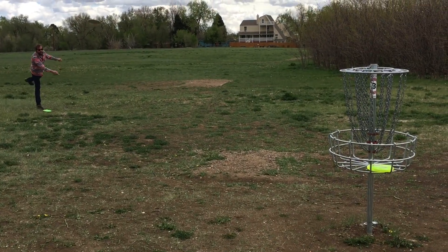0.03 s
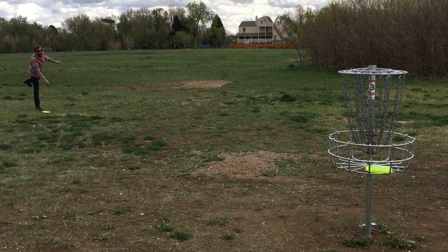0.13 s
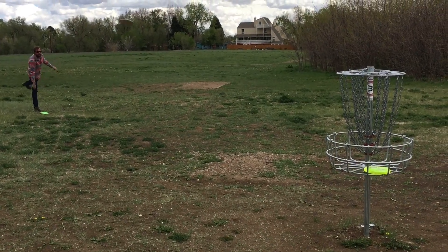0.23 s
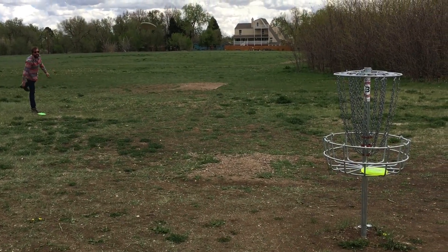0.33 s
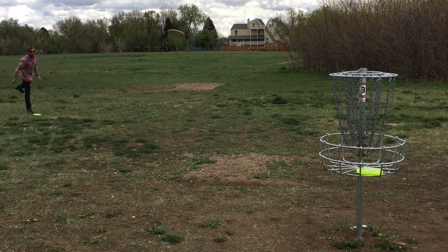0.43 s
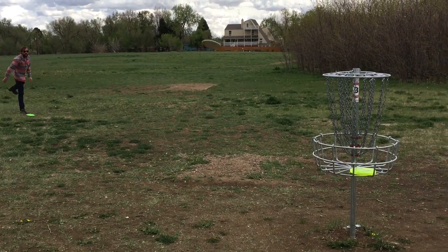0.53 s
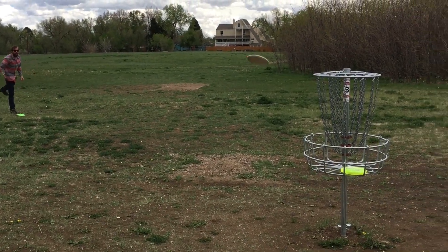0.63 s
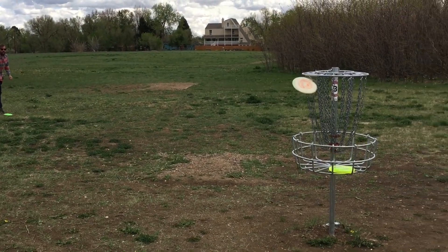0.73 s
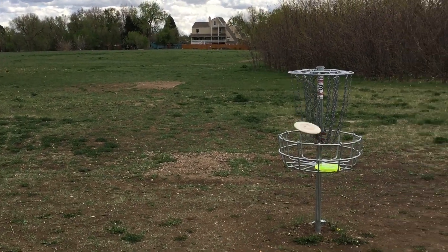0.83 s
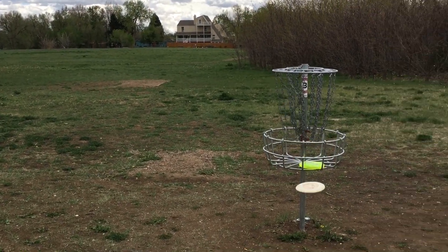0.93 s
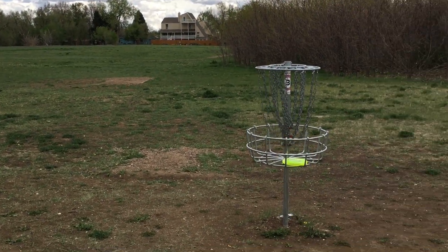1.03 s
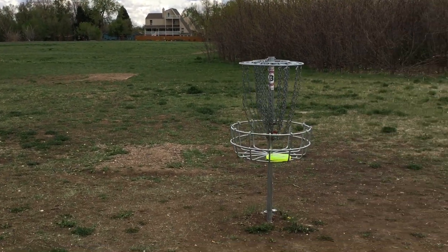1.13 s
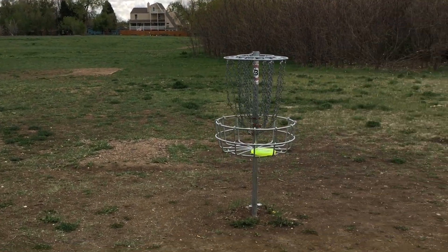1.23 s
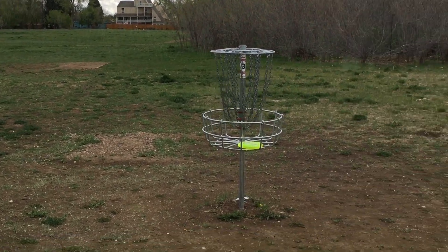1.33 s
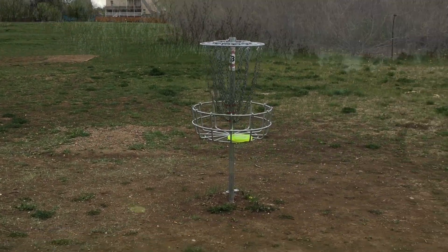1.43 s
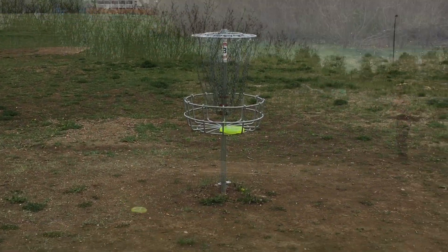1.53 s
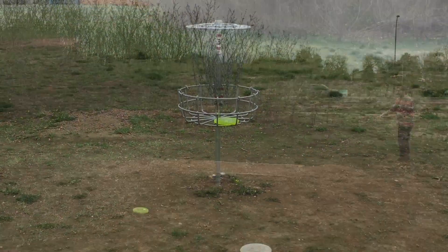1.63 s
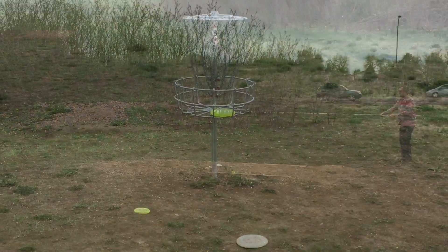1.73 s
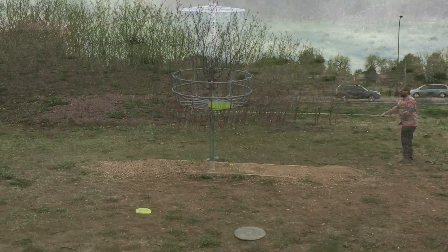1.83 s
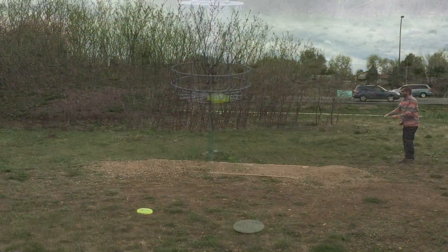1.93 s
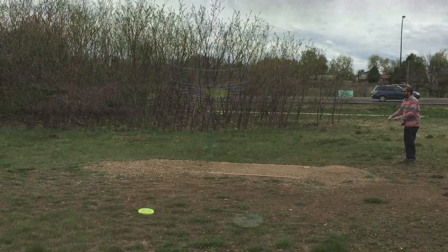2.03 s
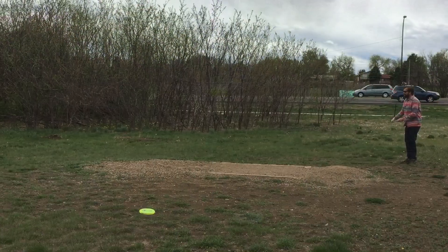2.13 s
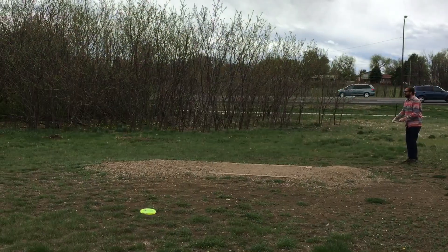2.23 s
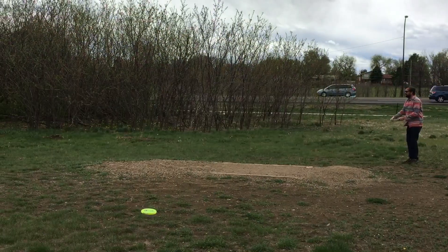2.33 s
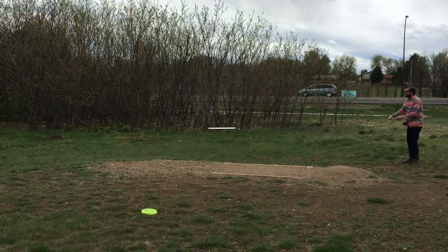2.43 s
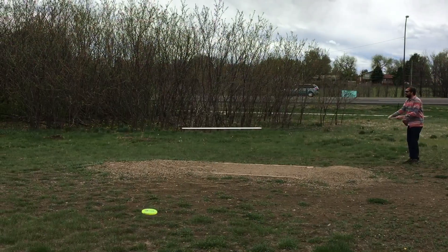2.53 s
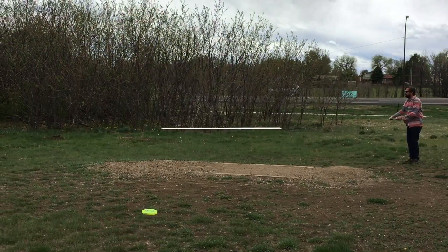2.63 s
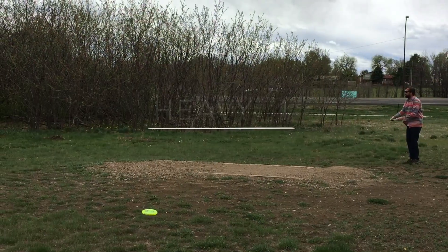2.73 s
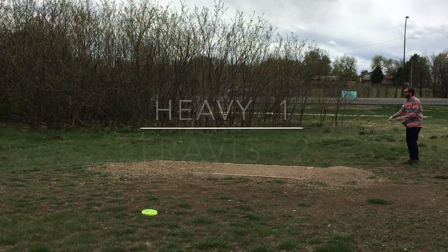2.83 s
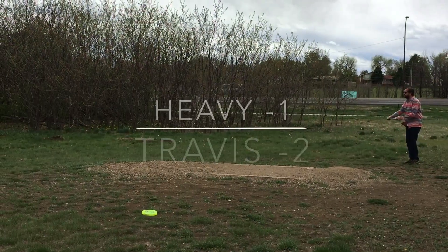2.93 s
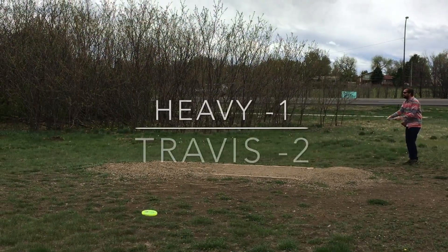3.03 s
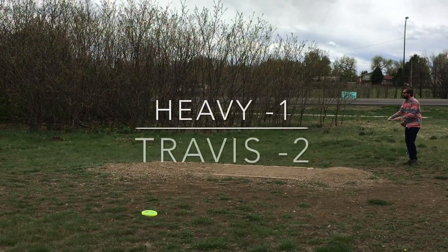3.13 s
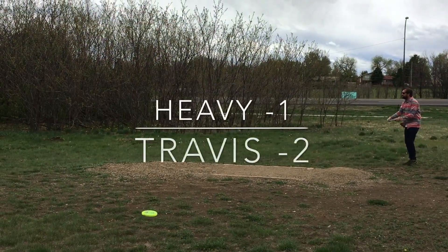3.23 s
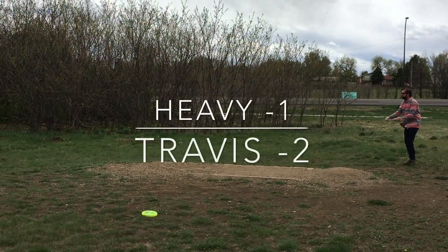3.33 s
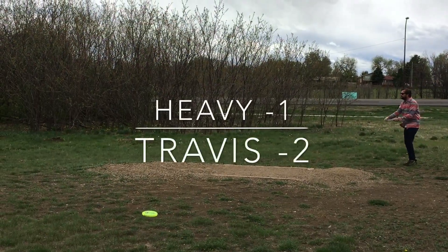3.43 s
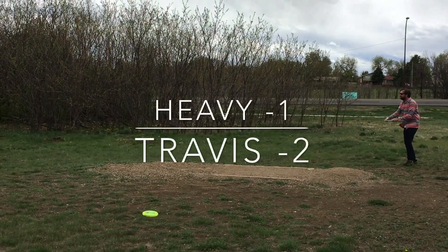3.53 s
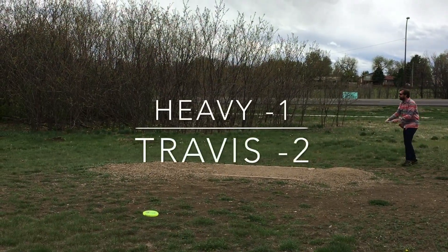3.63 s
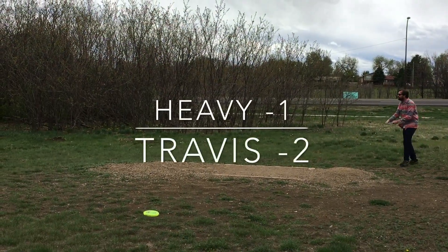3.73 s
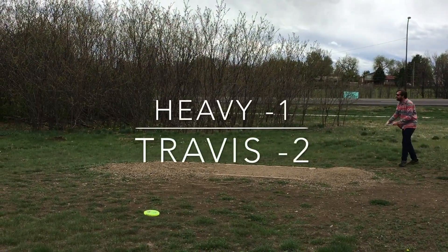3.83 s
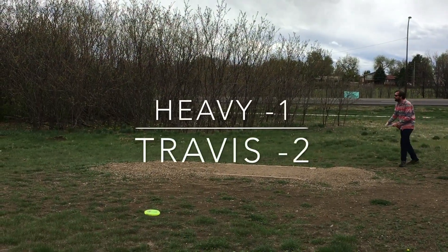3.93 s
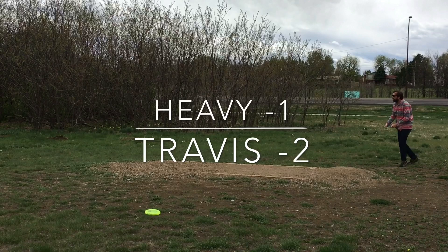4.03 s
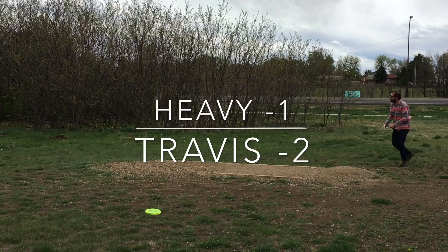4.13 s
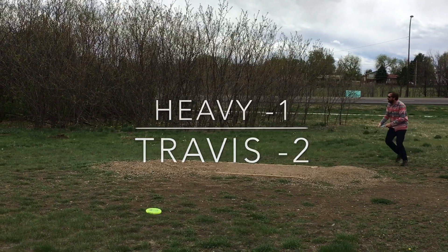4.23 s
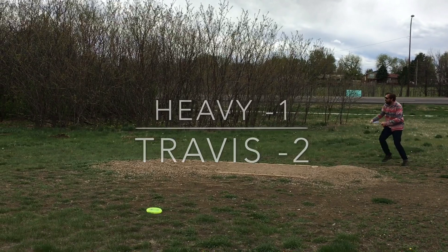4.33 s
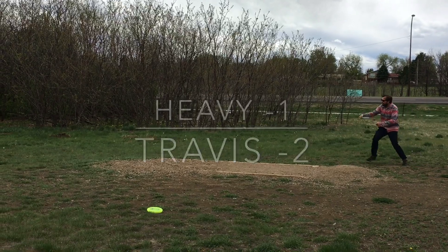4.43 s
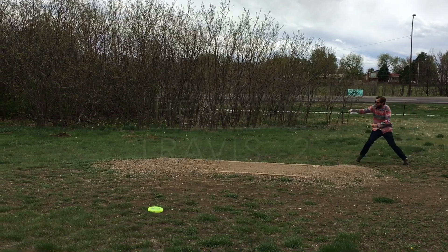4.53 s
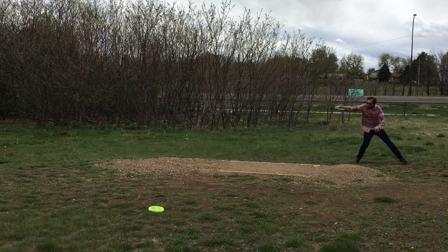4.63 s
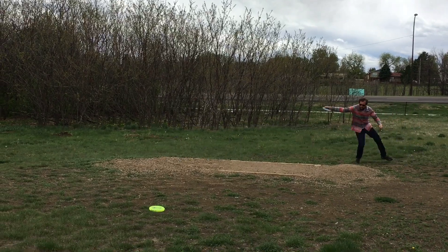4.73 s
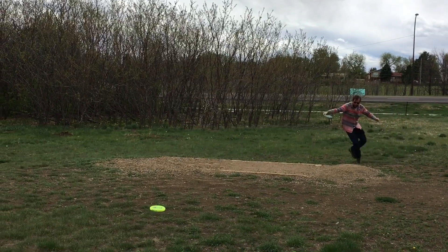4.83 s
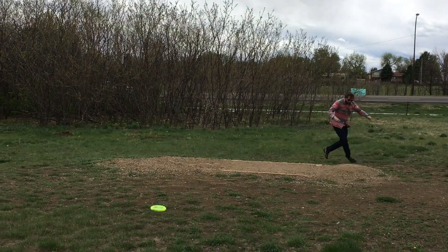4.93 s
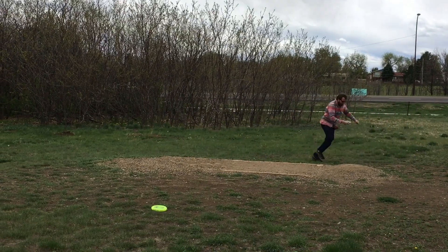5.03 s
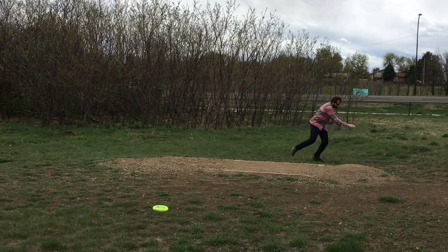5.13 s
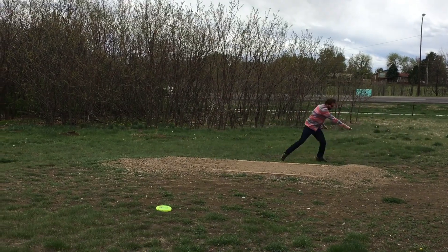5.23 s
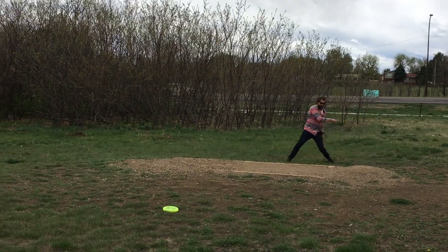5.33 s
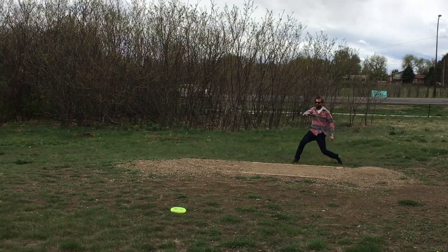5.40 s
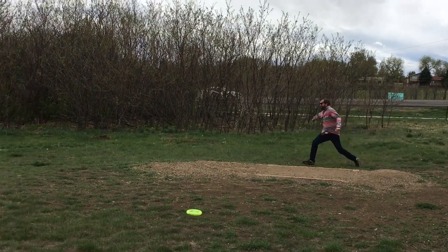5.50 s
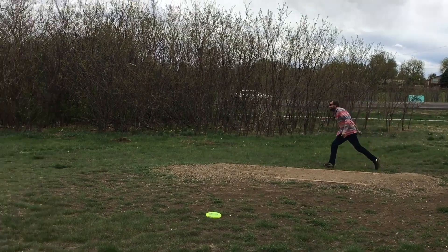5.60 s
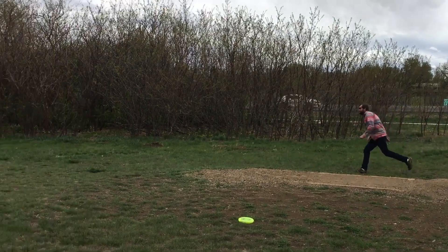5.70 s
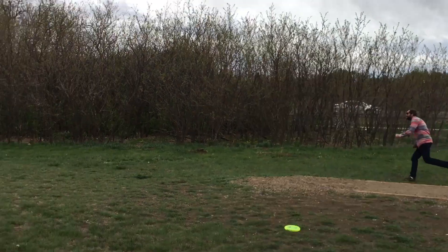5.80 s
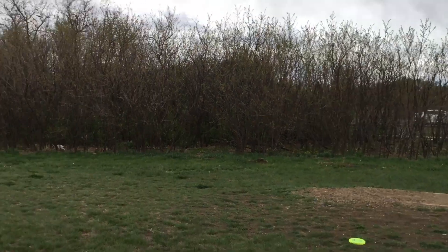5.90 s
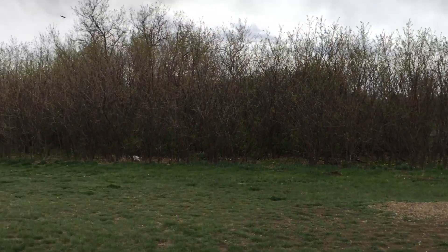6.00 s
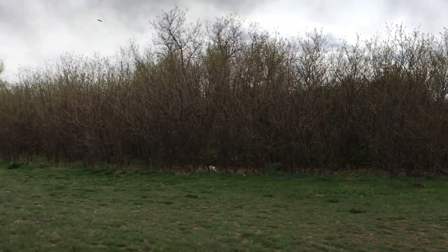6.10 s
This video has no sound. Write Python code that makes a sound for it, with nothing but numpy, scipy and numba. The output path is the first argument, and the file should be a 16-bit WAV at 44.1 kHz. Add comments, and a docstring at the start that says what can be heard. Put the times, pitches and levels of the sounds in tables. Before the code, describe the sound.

A thrown disc clashes into metal basket chains and thuds to the ground, chains tinkling out over gusty wind, then faint traffic and a small tick.

```python
"""Chains of a steel disc golf basket clash and swing for over a second: collisions ring damped link modes.
A thrown plastic disc strikes them, glances off and drops on the dirt, in knocks of short decaying sines.
Wind buffets the microphone in an open field: shaped noise that gusts and flutters, plus one-cycle thumps.
A distant road is steady noise over a wavering drone. A bird chirps faintly in rising, warbling sines.
Late on comes a faint swish of noise and a small dry tick."""
import sys
import numpy as np
from scipy import signal
from scipy.fft import rfft, irfft
from scipy.io import wavfile
from scipy.ndimage import uniform_filter1d, map_coordinates
from numba import njit

SR = 44100
rng = np.random.default_rng(int(sys.argv[2]) if len(sys.argv) > 2 else 0)


def transcribe(signal):
    """Save signal, clipped to [-1, 1], as a 16-bit WAV file at the path in sys.argv[1]."""
    frames = np.atleast_2d(signal).T
    limited = np.clip(frames, -1, 1)
    pcm = np.round(limited * 32767).astype(np.int16)
    wavfile.write(sys.argv[1], SR, pcm)


N = 271744
T = np.arange(N) / SR  # time axis, s
TOP_HZ = 15700  # upper edge of the link modes and of the final mix


def undb(db):
    """Turn decibels into linear gain."""
    return 10 ** (np.asarray(db) / 20)


def curve(rows, column=1):
    """Draw one column of a timed table as an envelope of straight lines."""
    rows = np.array(rows)
    return np.interp(T, rows[:, 0], rows[:, column])


def colour(hz, points):
    """Read the gain of a (freq_hz, level_db) spectrum, joined along log frequency."""
    freq_hz, level_db = np.transpose(points)
    return undb(np.interp(np.log(hz + 1), np.log(freq_hz), level_db))


def noise(points):
    """Shape white noise to a spectrum and scale it to rms 1."""
    bin_hz = np.arange(N // 2 + 1) * SR / N
    white = rfft(rng.standard_normal(N))
    shaped = irfft(white * colour(bin_hz, points), N)
    return shaped / shaped.std()


def walk(rate):
    """Drift smoothly through `rate` random knots per second, with spread 1."""
    knots = rng.standard_normal(4096)
    drift = map_coordinates(knots, [T * rate], order=2)
    return drift / drift.std()


def bump(hz, centre_hz, octaves):
    """Weight frequencies by a bell curve on the octave axis."""
    return np.exp(-.5 * (np.log2(hz / centre_hz) / octaves) ** 2)


def fade(t, t60):
    """Decay freely, falling 60 dB in t60 seconds."""
    return np.exp(-np.log(1000) * t / t60)


def add(out, start_s, sound):
    """Mix a sound into out from start_s."""
    i = max(int(start_s * SR), 0)
    out[i:i + len(sound)] += sound[:N - i]


def eddies(points, smooth_s):
    """Make turbulence noise whose strength is evened out over spans longer than smooth_s."""
    turbulence = noise(points)
    power = uniform_filter1d(turbulence ** 2, int(smooth_s * SR))
    return turbulence / np.sqrt(power)


# wind envelopes before trim and random gusting: start_s, rumble_db, flutter_db
WIND_LEVELS = [(0.0, -41, -47), (0.05, -28.5, -44), (0.08, -32, -30), (0.29, -23, -32.5),
               (0.36, -32.5, -37), (0.58, -26, -29), (0.63, -37, -26.5), (0.82, -25.5, -33),
               (0.98, -42.5, -53.5), (1.04, -28.5, -37.5), (1.13, -34, -31.5), (1.2, -32, -50),
               (1.29, -31, -46), (1.36, -44, -46.5), (1.87, -40.5, -47), (4.19, -41, -48),
               (4.29, -29, -43.5), (4.39, -41, -47.5), (4.92, -43, -45.5), (5.15, -37.5, -41.5),
               (5.61, -38, -46), (6.16, -35.5, -43.5)]
# relative spectrum of the deep wind rumble: freq_hz, level_db
RUMBLE_SPECTRUM = [(20, -27.5), (32, -8), (48, -2), (66, 4.5), (85, -4), (120, -6.5), (180, -22.5),
                   (300, -55), (2000, -95)]
# relative spectrum of the wind flutter above it: freq_hz, level_db
FLUTTER_SPECTRUM = [(70, -9), (130, 1), (200, 1), (280, -6.5), (400, -16), (600, -31.5), (1200, -68.5),
                    (5000, -92.5)]
# single eddies that thump the microphone: start_s, level_db (relative), pitch_hz
WIND_THUMPS = [(0.083, -12, 151), (.202, -12, 202), (.245, -10, 74), (.434, -14.5, 110), (.541, -11, 100),
               (0.582, -9.5, 130), (.662, -10, 190), (.718, -10, 99), (1.889, -24, 176),
               (4.25, -20.5, 54.5), (5.09, -22, 60)]


def wind(rumble_db=3.5, flutter_db=-0.9, rough_db=2, gust_db=1.5, gusts_per_s=9):
    """Turbulence on the microphone: deep gusting rumble, rougher flutter, and thumps of about one cycle."""
    rumble_level_db = curve(WIND_LEVELS, column=1) + rumble_db + gust_db * walk(gusts_per_s)
    flutter_level_db = curve(WIND_LEVELS, column=2) + flutter_db + rough_db * walk(45)
    out = eddies(RUMBLE_SPECTRUM, smooth_s=0.092) * undb(rumble_level_db)
    out += eddies(FLUTTER_SPECTRUM, smooth_s=0.062) * undb(flutter_level_db)
    for start_s, level_db, pitch_hz in WIND_THUMPS:
        cycles = pitch_hz * T[:SR // 6]
        swell = cycles / 0.59 * np.exp(1 - cycles / 0.41)  # quick rise, then gone within a few cycles
        add(out, start_s, undb(level_db) * np.sin(2 * np.pi * cycles) * swell)
    return out


# relative spectrum of the distant tyre roar: freq_hz, level_db
TYRE_SPECTRUM = [(150, -33.5), (330, -14), (430, -8), (600, -1.5), (1020, 0), (1400, -6), (2100, -18),
                 (3000, -25), (4900, -36.5), (6400, -37), (7600, -42), (9700, -41.5), (10400, -45),
                 (16000, -46.5)]
# tyre roar envelope before its waver: start_s, level_db
TYRE_LEVEL = [(0, -43.5), (.7, -45.5), (1.5, -48), (2.1, -49.5), (2.6, -48), (3.6, -47), (4.8, -47.5),
              (6.16, -46.5)]
# engine drone envelope before its throb: start_s, level_db
DRONE_ENVELOPE = [(0, -47.5), (1.5, -60), (2.3, -41), (3.6, -40), (4.8, -34.5), (6.16, -39.5)]
DRONE_HZ = 81.5  # centre of the wandering drone pitch


def road(waver_db=.5, throb_db=1.5):
    """Far tyres roar evenly as noise over the throbbing, wavering sine drone of an engine."""
    tyres = noise(TYRE_SPECTRUM) * undb(curve(TYRE_LEVEL) + waver_db * walk(7.1))
    firing_hz = DRONE_HZ + 1.5 * walk(6)
    drone = np.sqrt(2) * np.sin(2 * np.pi * np.cumsum(firing_hz) / SR)  # rms 1
    return tyres + drone * undb(curve(DRONE_ENVELOPE) + throb_db * walk(17))


@njit
def ring(at, blows, poles):
    """Ring damped modes, kicked at the sorted samples `at` by one row of blows each."""
    out = np.zeros(N)
    state = np.zeros(len(poles), np.complex128)
    j = 0
    for i in range(at[0], min(N, at[-1] + SR // 2)):
        while j < len(at) and at[j] == i:
            state += blows[j]
            j += 1
        total = 0.
        for m in range(len(poles)):
            state[m] *= poles[m]  # each pole turns and shrinks its mode
            total += state[m].imag
        out[i] = total
    return out


# chains swinging into each other: start_s, level_db (relative),
# spread_s (time over which further links collide), clink_db (extra gain near 4 kHz)
CHAIN_CLASHES = [(.7528, -25, .0004, -8), (0.7642, -17, .004, -9.5), (.774, -20, .014, -9),
                 (.793, -17, .012, 1), (0.809, -23.5, 0.012, -9), (0.9502, -30.5, 0.0032, 9),
                 (.995, -40.5, .008, 2), (1.12, -26, .005, 4), (1.157, -31.5, .008, 0),
                 (1.2438, -31, 0.011, 0), (1.2857, -39.5, 0.019, -7), (1.4017, -40.5, 0.0044, 8),
                 (1.4979, -50, 0.0033, 11), (1.5907, -42.5, .0005, -1), (1.6816, -53, 0.0053, 10),
                 (1.761, -56.5, .001, 5), (1.796, -44.5, 0.00011, -7), (1.925, -53.5, .003, 3.5),
                 (1.994, -62, .004, 4)]
# extra gain near 11.7 kHz, for free links and for links that the disc presses on
SHIMMER_DB, CHOKED_SHIMMER_DB = 1, -3.5
DISC_LEAVES_S = .785  # clashes that start before this have the disc pressing on the links


def links(hz, gain, t60, times, sizes, uneven_db):
    """Let every collision share its energy out among the link modes in its own way."""
    start_s, _, _, clink_db = np.array(CHAIN_CLASHES).T[:, :, None, None]
    shimmer_db = np.where(start_s < DISC_LEAVES_S, CHOKED_SHIMMER_DB, SHIMMER_DB)
    tint = undb(clink_db * bump(hz, 4070, 0.051) + shimmer_db * bump(hz, 11700, .09))
    shape = (*times.shape, len(hz))  # clash, collision, mode
    polarity = rng.choice([-1, 1], shape)
    share = polarity * undb(uneven_db * rng.standard_normal(shape)) * gain
    share /= np.linalg.norm(share, axis=2, keepdims=True)  # equal energy before the tint
    blows = (sizes[:, :, None] * tint * share).reshape(-1, len(hz))
    order = np.argsort(times.ravel())
    at = (times.ravel()[order] * SR).astype(np.int64)
    poles = np.exp(2j * np.pi * hz / SR) * fade(1 / SR, t60)
    return ring(at, blows[order], poles)


# relative strength of the many weaker link modes: freq_hz, level_db
LINK_SPECTRUM = [(1000, -3.5), (2600, -9), (3700, -3), (4150, 8), (4800, -3), (5600, 2), (7200, -4.5),
                 (8600, 0), (9600, 4.5), (10450, -8.5), (11500, 10), (12800, 3.5), (14800, -1.5),
                 (15500, 0)]


def crowd(t60, times, sizes, uneven_db, count, damping=.25):
    """No two links are alike: their modes fill the treble, the high ones dying sooner."""
    spacing_hz = TOP_HZ / count
    hz = np.linspace(1000, TOP_HZ, count) + rng.uniform(-1, 1, count) * spacing_hz / 2
    mode_t60 = t60 * (hz / hz.mean()) ** -damping
    return links(hz, colour(hz, LINK_SPECTRUM), mode_t60, times, sizes, uneven_db)


# the clearest ring tones of the links: pitch_hz, level_db (relative)
RING_TONES = [(4001, -3), (4040, -4), (4062, -1), (4140, -12), (4183, -10.5), (4420, -15.5), (5416, -16),
              (5577, -16.5), (9534, -12), (11079, -10), (11246, -12), (11347, -6.5), (11412, -8.5),
              (11509, -1), (11596, -1.5), (11733, -7.5), (11849, -12), (11985, -6), (12160, -12),
              (12498, -9), (13737, -11)]


def chains(smear_s=0.0031, scatter_db=4.0, crack_db=6, crack_t60=0.029, jangle_db=-2, jangle_t60=.12,
           tone_db=-2.0, tone_t60=0.34, free_db=-16, free_t60=.9, count=12):
    """Each clash is one collision and a scatter of smaller ones along the strands."""
    start_s, level_db, spread_s = np.array(CHAIN_CLASHES).T[:3, :, None]
    turn = (np.arange(count) + rng.random((len(start_s), count))) / (count + 1)
    delay_s = spread_s * -np.log(1 - turn)  # crowded early, thinning out late
    times = start_s + delay_s * (np.arange(count) > 0)  # the first lands on the clash itself
    # the longer a clash lasts, the less of its energy is in the first collision
    first = 1 / (1 + spread_s / smear_s)
    sizes = undb(scatter_db * rng.standard_normal(times.shape))
    sizes *= np.sqrt(1 - first) / np.linalg.norm(sizes, axis=1, keepdims=True)
    sizes[:, :1] += np.sqrt(first)
    sizes *= undb(level_db)
    tone_hz, tone_level_db = np.transpose(RING_TONES)
    tones = links(tone_hz, undb(tone_level_db), tone_t60, times, sizes, uneven_db=1.5)
    # pinched links are choked at once, loose ones jangle, those that hang free ring on
    pinched = crowd(crack_t60, times, sizes, uneven_db=1.0, count=200)
    loose = crowd(jangle_t60, times, sizes, uneven_db=9, count=160)
    free = crowd(free_t60, times, sizes, uneven_db=-2.0, count=200)
    out = undb(crack_db) * pinched + undb(jangle_db) * loose
    return out + undb(free_db) * free + undb(tone_db) * tones


def strays(stray_db=-4, lag_s=0.094, fall_db=-10, t60=0.035, loudest_db=-29, count=10):
    """After a clash single links click as they settle, each click favouring only a few modes."""
    start_s, level_db = np.array(CHAIN_CLASHES).T[:2, :, None]
    late = (np.arange(count) + rng.random((len(start_s), count))) / count  # 0 to 1 across the lag
    sizes = undb(np.minimum(level_db, loudest_db) + stray_db + fall_db * late)
    return crowd(t60, start_s + lag_s * late, sizes, uneven_db=17, count=160)


# the disc's own modes: pitch_hz, level_db (relative), t60_s
PLASTIC_MODES = [(318, 0, .03), (492, 1.5, 0.02), (743, 5.5, 0.012), (990, -7, 0.027), (1223, -2, 0.02138),
                 (1700, -8, 0.027), (1987.8, -6.5, 0.02), (3020, -5, 0.012), (3570, -6.5, .018),
                 (5635, -5, .012), (7100, -5.5, .01)]
# the disc on the chains, then on the ground: start_s, level_db (relative),
# contact_hz (pitch that the contact favours)
DISC_HITS = [(0.7549, -12.5, 2970), (.7558, -23.5, 1186), (.7645, -17.5, 3500), (.794, -27, 2100),
             (1.1234, -13, 930), (1.1289, -20.5, 810), (1.1316, -15, 372), (1.373, -34, 660)]


def disc(octaves=0.99):
    """Short plastic knocks: each contact favours its own band of the disc's modes."""
    out, t = np.zeros(N), T[:SR // 8]
    for start_s, level_db, contact_hz in DISC_HITS:
        knock = np.zeros(len(t))
        for k, (pitch_hz, mode_db, t60_s) in enumerate(PLASTIC_MODES):
            gain = (-1) ** k * undb(mode_db) * bump(pitch_hz, contact_hz, octaves)  # polarity alternates
            knock += gain * np.sin(2 * np.pi * pitch_hz * t) * fade(t, t60_s)
        add(out, start_s, undb(level_db) * knock)
    return out


# light touches of the swaying strands: first and last, level before tone and scatter, and its fall
SWAY_FROM_S, SWAY_TO_S, SWAY_DB, SWAY_FALL_DB_PER_S = 0.96, 1.95, -36.5, 18.5


def sway(scatter_db=3, t60=0.11, count=90):
    """Strands graze ever more lightly as the swing dies: rows of pings, each on one ring tone."""
    turn = (np.arange(count) + rng.random(count)) / count
    start_s = SWAY_FROM_S + (SWAY_TO_S - SWAY_FROM_S) * turn
    pitch_hz, tone_db = rng.choice(np.array(RING_TONES), count).T
    fallen_db = SWAY_FALL_DB_PER_S * (start_s - SWAY_FROM_S)
    level_db = SWAY_DB + tone_db - fallen_db + scatter_db * rng.standard_normal(count)
    return np.column_stack([start_s, level_db, pitch_hz, np.full(count, t60)])


# the clearest single links that ping on their own:
# start_s, level_db (stronger tone of the pair), pitch_hz, t60_s
LINK_PINGS = [(1.013, -46, 3170, .17), (1.014, -34, 9660, 0.05), (1.245, -32, 9550, 0.12),
              (1.288, -37, 9630, 0.18), (1.300, -29.5, 11630, 0.2), (1.367, -38, 11800, 0.05),
              (1.699, -45, 11690, .067), (1.73, -59, 5140, .7), (1.7969, -39.5, 9670, 0.019),
              (1.816, -48, 11800, 0.053), (1.926, -62, 5400, 0.38)]


def pings(rows, split=0.0045):
    """A link is not quite round: its mode is a close pair that beats."""
    out, t = np.zeros(N), T[:SR // 2]
    for start_s, level_db, pitch_hz, t60_s in rows:
        twin_hz = pitch_hz * (1 + split * rng.uniform(0.6, 1.5))
        pair = np.sin(2 * np.pi * pitch_hz * t) + .5 * np.sin(2 * np.pi * twin_hz * t)
        add(out, start_s, undb(level_db) * pair * fade(t, t60_s))
    return out


# bird chirps: start_s, level_db, pitch_hz (start of the rise, before the warble)
BIRD_CHIRPS = [(1.81, -59, 2160), (3.59, -64, 2530), (3.765, -62.5, 2600), (3.89, -70, 2500),
               (4.07, -63, 2650)]


def bird(length_s=0.067, rise_hz=330, warble_hz=110):
    """Faint chirps: swelling sines whose pitch rises steadily and warbles at random."""
    out, swell = np.zeros(N), np.hanning(int(length_s * SR))
    for start_s, level_db, pitch_hz in BIRD_CHIRPS:
        rise = np.linspace(0, rise_hz, len(swell))
        warble = warble_hz * walk(160)[:len(swell)]
        phase = 2 * np.pi * np.cumsum(pitch_hz + rise + warble) / SR
        add(out, start_s, undb(level_db) * swell * np.sin(phase))
    return out


# relative spectrum of the tick's noise: freq_hz, level_db
TICK_SPECTRUM = [(1500, -25), (2500, -9), (3300, 7), (4000, -3), (6200, 1), (10000, -6), (16000, -19)]
TICK_S, TICK_DB = 5.5574, -41  # onset, and level of its noise before the decay


def tick(t60=0.016, body_hz=3380, body_db=-40, swish_db=-67, lead_s=0.071):
    """A faint swell of swishing noise, then one dry tick: decaying noise with a short hollow ring."""
    out, t, swell = np.zeros(N), T[:SR // 10], np.hanning(SR // 12)
    snap = undb(TICK_DB) * noise(TICK_SPECTRUM)[:len(t)]
    body = undb(body_db) * np.sin(2 * np.pi * body_hz * t)
    add(out, TICK_S, (snap + body) * fade(t, t60))
    swish = noise([(4500, -25), (6200, 5), (7600, -11.5), (16000, -12)])[:len(swell)]
    add(out, TICK_S - lead_s, undb(swish_db) * swell * swish)
    return out


def scene():
    """Sum every source dry: an open field has no echoes."""
    air = wind() + road()
    basket = chains() + strays() + pings(sway()) + pings(LINK_PINGS)
    return (air + basket + disc() + bird() + tick())[None]


def record(dry, low_cut_hz=32):
    """Thin the deepest bass, ease in and out over 4 ms, and cut the top steeply."""
    bass_cut = signal.butter(2, low_cut_hz, "highpass", fs=SR, output="sos")
    top_cut = signal.ellip(10, .2, 80, TOP_HZ, fs=SR, output="sos")
    thinned = signal.sosfilt(bass_cut, dry)
    eased = thinned * np.minimum(1, np.minimum(T, T[-1] - T) / .004)
    return signal.sosfilt(top_cut, eased)


dry = scene()
out = record(dry)
transcribe(out)
```